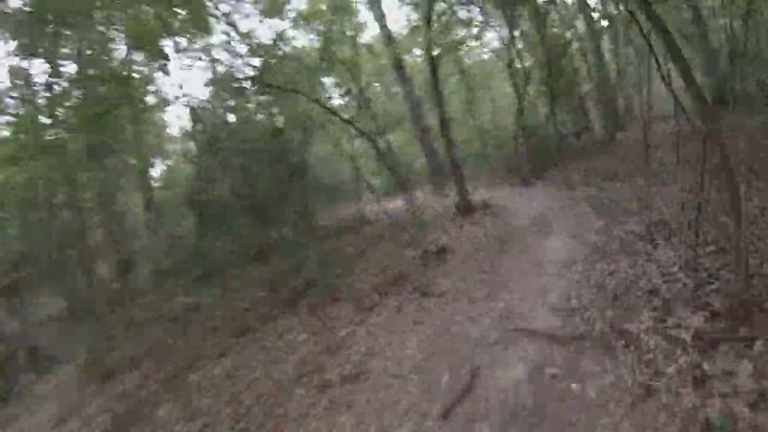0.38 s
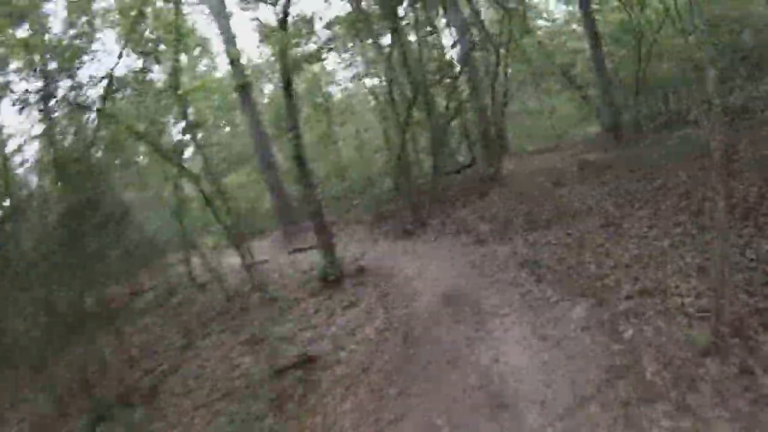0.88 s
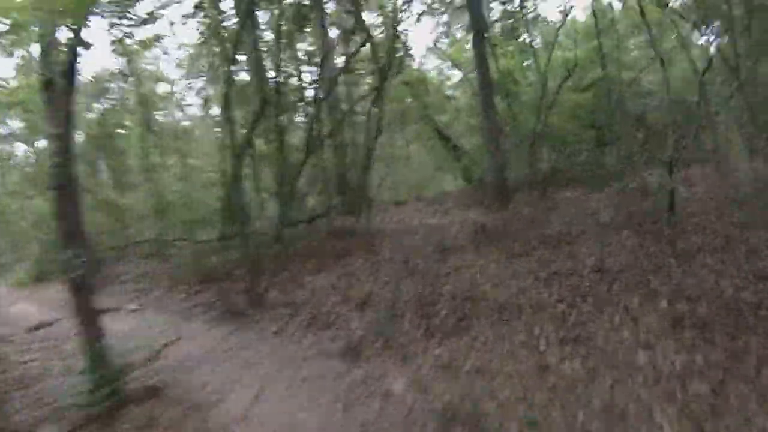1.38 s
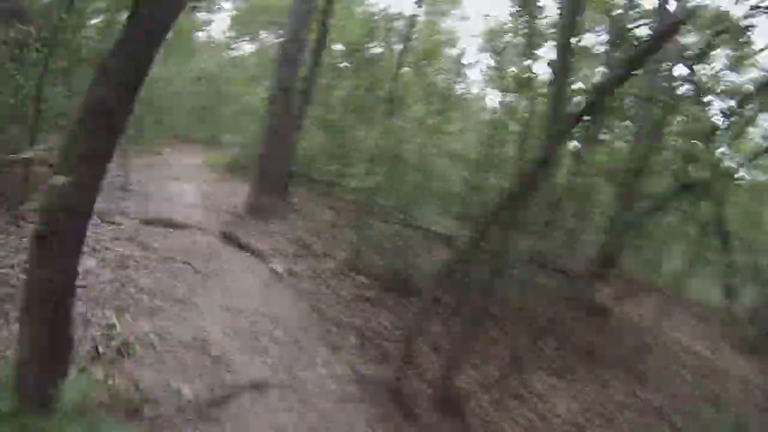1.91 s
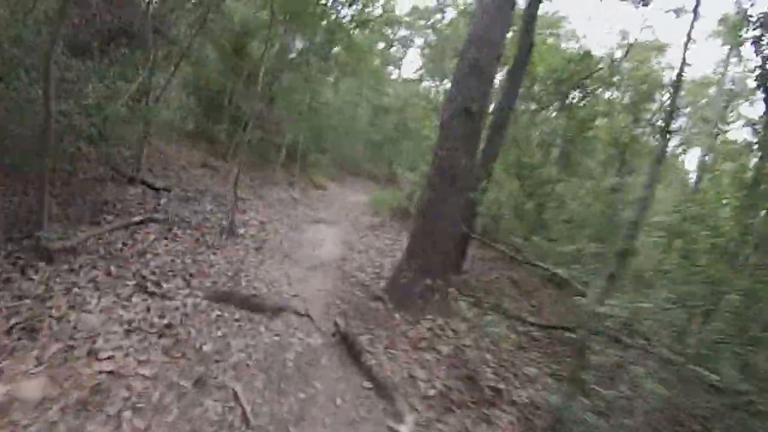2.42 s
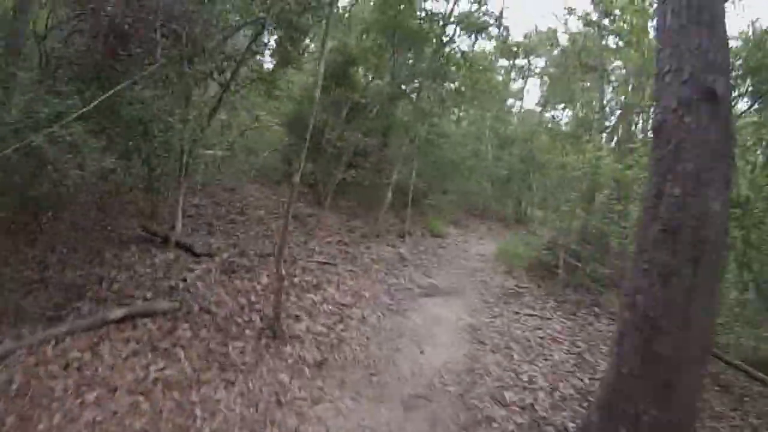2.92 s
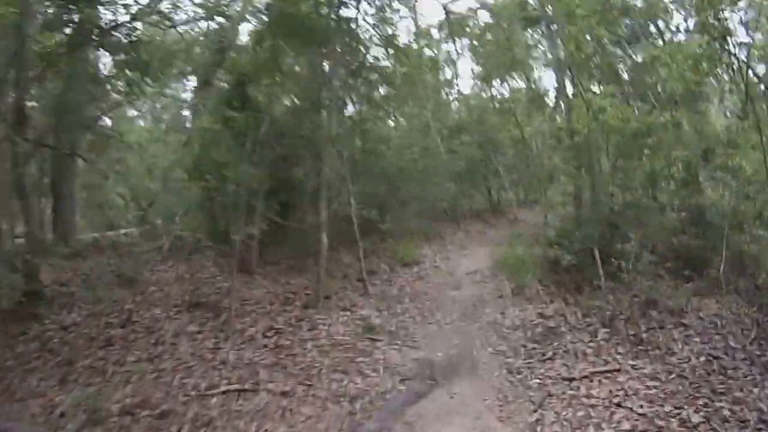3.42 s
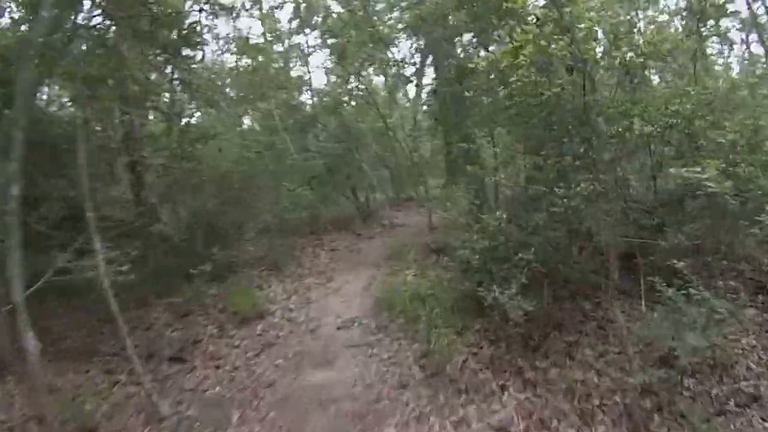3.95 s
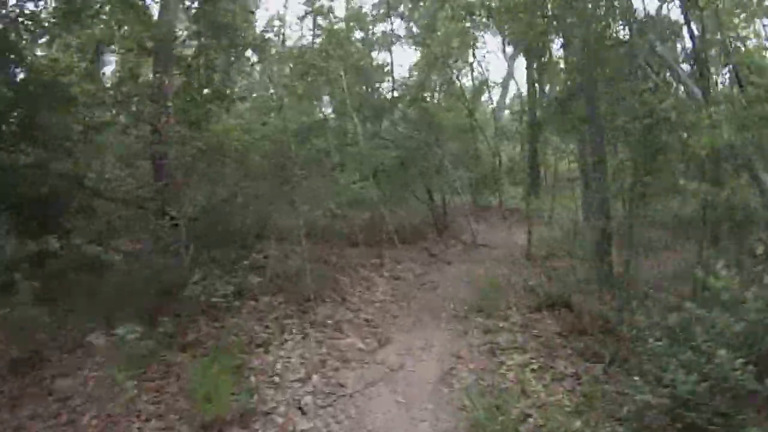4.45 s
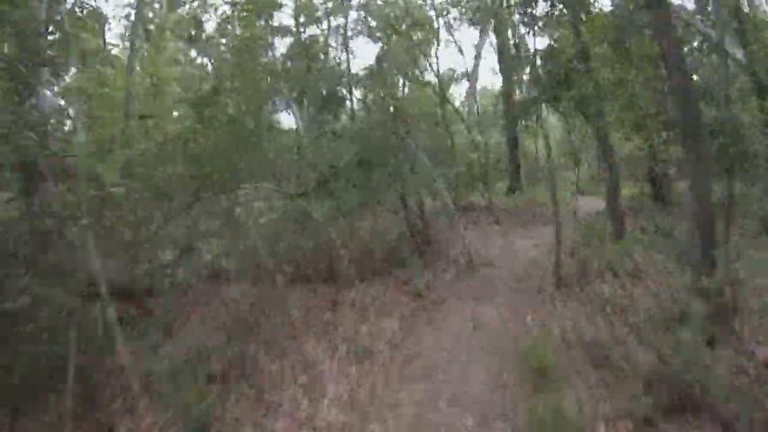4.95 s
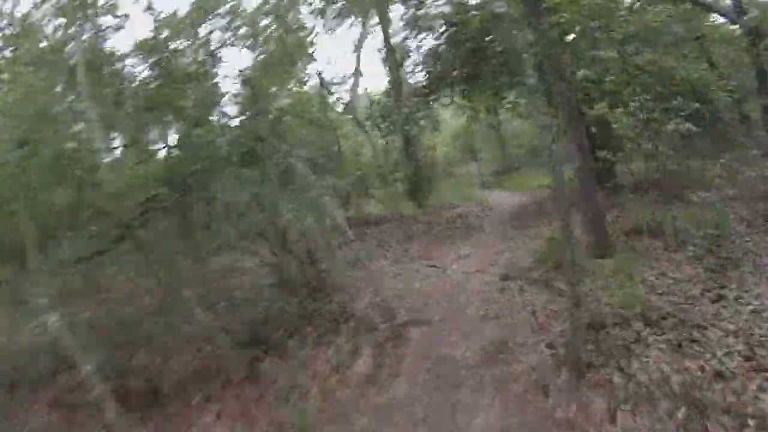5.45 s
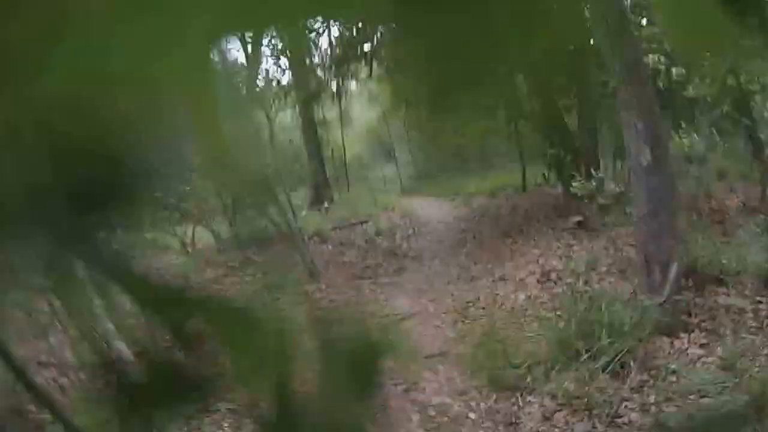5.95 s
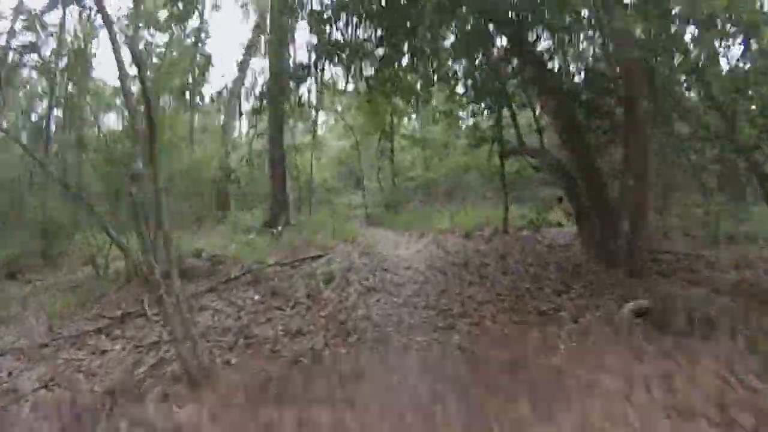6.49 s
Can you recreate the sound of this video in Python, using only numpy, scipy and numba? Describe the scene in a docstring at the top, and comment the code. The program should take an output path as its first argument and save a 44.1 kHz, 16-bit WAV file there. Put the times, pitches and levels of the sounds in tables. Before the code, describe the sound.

Rough woodland ride heard from the bike itself, close, dull and bass-heavy. Continuous low vibration and wind rumble swell and drop, punched by uneven thumps. Loose parts click and rattle, leaves or twigs scrape briefly, and tyres hiss softly underneath. One tiny distant bird chip is nearly buried early on. The loudest jolts make the level duck with a slight buzz, and a sharper clatter arrives shortly before the end.

```python
"""A low throb near 58 Hz comes first, dips at once, and is broken by a hard knock after a quarter second.
Woods, rough dirt trail: a camera clamped to a rolling bicycle, its microphone close on the frame.
The clamp is one swinging resonance; noise through resonances makes the frame's rumble, clicks and chatter.
Wind buffets the microphone, tyres hiss and hum, and one far bird chips as a falling whistle.
The camera's gain control turns down in small steps on big swings, a buzz, and ticks on its way back up."""
import sys
import numpy as np
from scipy import signal
from scipy.fft import rfft, irfft, next_fast_len
from scipy.io import wavfile
from scipy.ndimage import uniform_filter1d, map_coordinates
from numba import njit

SR = 44100
rng = np.random.default_rng(int(sys.argv[2]) if len(sys.argv) > 2 else 0)


def gain_from_db(level_db):
    """Turn a decibel level (scalar or array-like) into a linear amplitude factor."""
    decades = np.asarray(level_db, float) / 20
    return 10 ** decades


def wav_out(sig):
    """Save sig, one row per channel (or a flat mono array), as 16-bit PCM at SR to the path in sys.argv[1]."""
    wavfile.write(sys.argv[1], SR, np.round(np.clip(np.atleast_2d(sig).T, -1, 1) * 32767).astype(np.int16))


N = 291060
TIME = np.arange(N) / SR  # s


def along(points, hz):
    """(Hz, value) points read off on a log frequency axis."""
    f, v = np.transpose(points)
    return np.interp(np.log(hz + 1), np.log(f + 1), v)


def wobble(rate):
    """A smooth random curve with rate knots a second."""
    knots = rng.standard_normal(int(N * rate / SR) + 4)
    return map_coordinates(knots, [np.arange(N) * rate / SR])


def noise():
    """White noise of rms 1."""
    return rng.standard_normal(N)


def sparse(rate):
    """Random clicks, rate of them a second on average."""
    return noise() * (rng.random(N) < rate / SR)


def filtered(x, response):
    """x passed through a complex response of frequency."""
    m = next_fast_len(N + SR // 2)
    return irfft(rfft(x, m) * response(np.fft.rfftfreq(m, 1 / SR)), m)[:N]


def unit(x):
    """Scaled to rms 1."""
    return x / np.sqrt(np.mean(x ** 2))


def modes(table):
    """Causal response of (Hz, width Hz, dB) resonances, alternating in sign."""
    def response(f):
        return sum((-1) ** k * gain_from_db(db) * 1j * f * w / (c * c - f * f + 1j * f * w)
                   for k, (c, w, db) in enumerate(table))
    return response


def steep(table):
    """Gain of (Hz, width Hz, dB) resonances with steep sides: dark valleys between them."""
    def response(f):
        return np.sqrt(sum(gain_from_db(2 * db) / (1 + (2 * (f - c) / w) ** 2) ** 2 for c, w, db in table))
    return response


def swell(s, rise, fall):
    """A triangle in time that tops out at 1 at s; rise and fall in s."""
    return np.interp(TIME, [s - rise, s, s + fall], [0, 1, 0])


# tall swings of the clamp, first jolts and the swings that follow:
# t/s, top signed up or down (full scale 1), relative knock level/dB
TALL_SWINGS = [(0.2265, 0.5, -18), (0.2376, -.45, -32.5), (0.267, -0.3, -33), (0.2739, 0.76, -26.5),
               (0.3374, 0.62, -13), (0.346, -.62, -31), (0.5554, 0.26, -30.5), (0.5909, .35, -39),
               (0.684, -.33, -30), (0.7401, .36, -32), (0.8455, .36, -25.5), (0.95, -0.19, -23.5),
               (1.009, 0.28, -23), (1.0661, 0.97, -11.5), (1.1937, -0.33, -32.5), (1.3285, -.4, -25),
               (1.3713, 0.27, -33), (1.497, 0.27, -29), (1.524, -0.28, -30), (1.5515, 0.5, -19.5),
               (1.8912, -0.25, -32), (1.9335, 0.36, -25.5), (1.9614, -0.31, -32), (2.1205, 0.32, -31.5),
               (2.1645, -0.26, -35), (2.2112, -0.29, -36.5), (2.3467, 0.79, -17.5), (2.356, -0.78, -33.5),
               (2.549, -0.25, -34), (2.7434, .4, -33.5), (2.7501, -.58, -29), (2.8217, 0.29, -31),
               (2.878, -0.25, -34), (2.916, -0.3, -31.5), (2.925, 0.39, -23.5), (3.0193, 0.24, -36),
               (3.1001, -.3, -24.5), (3.139, -0.33, -26.5), (3.146, 0.58, -32), (3.242, .58, -22),
               (3.251, -.45, -34), (3.3525, -0.24, -34.5), (3.496, 0.24, -34), (3.57, -0.23, -32),
               (3.5964, 0.39, -29), (3.787, -0.3, -24.5), (3.856, .46, -25.5), (3.972, -0.25, -17.5),
               (4.0064, -0.24, -24.5), (4.1186, 0.33, -24), (4.1458, -0.26, -21.5), (4.2562, .32, -30),
               (4.3143, -0.37, -23), (4.3689, -0.24, -29), (4.5182, 0.89, -12), (4.553, 0.25, -31.5),
               (4.595, -0.23, -30), (4.6207, 0.32, -24.5), (4.733, 0.22, -26), (4.743, -0.58, -17),
               (4.7701, 0.82, -16), (4.855, -0.32, -26), (4.9693, -0.33, -29), (4.979, 0.47, -29.5),
               (5.0405, -0.21, -31), (5.102, 0.27, -34), (5.258, 0.19, -35), (5.4299, 0.26, -27),
               (5.4944, -0.21, -23.5), (5.501, 0.55, -27), (5.5817, 0.55, -18), (5.591, -.55, -29),
               (5.7221, -0.42, -23), (5.73, .68, -16), (5.8143, -0.31, -22), (5.928, -0.33, -25.5),
               (5.957, -0.33, -17), (6.1699, -0.31, -27), (6.177, 0.32, -33.5), (6.2745, -.41, -25.5),
               (6.4372, 0.23, -25.5), (6.488, 0.27, -21.5), (6.5689, 0.65, -17.5)]
# moments when the swing dies away: t/s, depth/dB, half length/s
LULLS = [(0.066, 9, 0.042), (1.375, 5, 0.061), (2.81, 17.5, 0.046), (3.423, 7.5, 0.036),
         (3.623, 16.5, 0.057), (4.409, 4.5, 0.079), (6.111, 14.5, 0.033)]
# spectrum shape of wind on the microphone: f/Hz, relative level/dB per Hz
BUFFET = [(8, -30.5), (18, -5), (30, 0.5), (50, 0.5), (80, -8), (120, -25), (300, -50), (1000, -88.5)]


def clamp():
    """One resonance, led up or down to the top of each tall swing, that rings on from there."""
    clamp_hz, usual_swing_db, buffet_db = 57.92, -19.5, -26.5  # both levels rms
    free_swing = 0.37  # wider swings than this are damped between the tall ones (full scale 1)
    lull_db = sum(db * np.exp(-((TIME - s) / half) ** 2) for s, db, half in LULLS)
    turn = 2 * np.pi * np.cumsum(clamp_hz + 1.2 * wobble(18)) / SR
    s, top, knock_db = np.transpose(TALL_SWINGS)
    at = np.round(s * SR).astype(int)

    # the old rhythm holds until shortly before a tall swing, then gives way
    shift = np.unwrap(np.pi * (top < 0) - turn[at])
    hold_until = np.maximum(s - .09, np.r_[0, s[:-1]] + 0.003)
    old_shift = np.r_[shift[0], shift[:-1]]
    turn = turn + np.interp(TIME, np.ravel([hold_until, s], "F"), np.ravel([old_shift, shift], "F"))

    size = np.sqrt(2) * gain_from_db(usual_swing_db - lull_db + 1.5 * wobble(20))
    calm = np.ones(N)
    # the knock carries part of the peak
    peaks = np.abs(top) - 0.44 * gain_from_db(knock_db)
    for when, peak, i in zip(s, peaks, at):
        near = slice(max(i - SR // 10, 0), i + SR // 10)
        t = TIME[near]
        grip = np.exp(-((t - when) / np.where(t < when, .008, .016)) ** 2)
        size[near] += grip * (peak - size[near])
        calm[near] *= 1 - grip

    # gusts push the microphone about, except around the tall swings
    gusts = noise() * gain_from_db(0.77 * wobble(8.8))
    buffet = filtered(gusts, lambda hz: gain_from_db(along(BUFFET, hz)))
    swing = size * np.cos(turn) + gain_from_db(buffet_db) * calm * unit(buffet)

    # left to itself, the rubber lining damps the widest swings
    envelope = np.abs(signal.hilbert(swing, next_fast_len(N))[:N])
    width = uniform_filter1d(envelope, size=SR // 100)
    return swing / (1 + calm * (width / free_swing) ** 4) ** 0.2


# low resonances of frame and fork: f/Hz, width/Hz, relative level/dB
FRAME = [(91.7, 40, 4), (180.6, 60, 1), (251.2, 44, -2.5), (422.8, 86, -13.5), (656, 110, -21)]


def frame():
    """Rough ground shakes the frame's low resonances; each tall swing has a short knock at its top."""
    rumble_db = -41.5  # rms before the lining
    ground = noise() * gain_from_db(2 * wobble(45) + 1.5 * wobble(9))
    rumble = gain_from_db(rumble_db) * unit(filtered(ground, steep(FRAME)))

    push, grit = np.zeros(N + SR), np.zeros(N + SR)
    t = np.arange(-SR // 40, SR // 40) / SR
    shape = np.exp(-(t / np.where(t < 0, .007, .006)) ** 2)
    early = np.roll(shape, -SR // 125)  # the grit burst comes 8 ms before the top
    for s, top, db in TALL_SWINGS:
        luck = rng.standard_normal(len(t))
        i = round((s + t[0]) * SR)
        knock_hz = 140 * (1 + .1 * luck[0])
        knock = gain_from_db(db - 8) * shape * np.cos(2 * np.pi * knock_hz * t)
        # the fork shudders just before the top
        lead = t + .01
        shudder = gain_from_db(db - 13.5) * np.exp(-(lead / 0.006) ** 2) * np.cos(2 * np.pi * 240 * lead)
        push[i:i + len(t)] += np.sign(top) * (knock + shudder)
        grit[i:i + len(t)] += gain_from_db(db + 15.0) * early * luck

    shaking = rumble + filtered(grit[:N], steep(FRAME))
    # the clamp's rubber lining passes little of the higher shaking
    return push[:N] + filtered(shaking, lambda hz: 1 / (1 + 1j * hz / 900) ** 2)


# short clicks and rattles, some of loose parts, some like the gain control's ticks:
# t/s, peak level/dB, relative brightness/dB
CLICKS = [(0.284, -36.5, -6), (0.9484, -33, -9.5), (0.988, -34, -14.5), (1.0193, -35, -8),
          (1.1439, -46.5, -8), (1.235, -36.5, -10), (1.402, -35.5, -11.5), (1.4806, -36, -8.5),
          (2.114, -43, -3), (2.1639, -47.5, 4), (2.2742, -40.5, -17), (2.359, -35.5, -13),
          (2.841, -36.5, -14), (3.2173, -32.5, -11), (3.5127, -26, -8.5), (3.6801, -36, -8),
          (3.7198, -40, -32.5), (3.7721, -36.5, -16), (3.963, -51.5, -1), (4.111, -43, -6.5),
          (4.4995, -51, 7.5), (4.5042, -46, 2), (4.764, -37, -2.5), (4.893, -45, -15),
          (4.9998, -41.5, -12.5), (5.029, -38, -41), (5.0599, -34, -32), (5.168, -44, -15),
          (5.23, -44.5, -26), (5.5402, -32.5, -36), (5.5725, -32.5, -12), (5.646, -46, -9.5),
          (5.718, -33, -13), (5.8141, -26, -4), (5.886, -36, -9), (5.9474, -35, -4.5), (5.9615, -22, -37.5),
          (5.972, -37, 6), (5.9923, -34, 12), (5.998, -33, 1), (6.032, -45, -8), (6.0467, -42.5, 11),
          (6.0692, -35.5, 9), (6.117, -47, -12), (6.273, -38.5, -10), (6.319, -44.5, -26),
          (6.349, -37.5, -12), (6.42, -45.5, -5.5), (6.557, -28, -4.5)]
# what the tubes ring with: f/Hz, relative level/dB, t60/s
TUBES = [(650, -13, .02), (1180, -11, .02), (1380, -1, .023), (1950, -3, .012), (2340, -10, .03),
         (3150, -4, .009), (3480, -5, .009), (5050, -27, .05)]


def clicks():
    """A short noise burst excites a dry crack and the tubes' modes, each time at new strengths and pitches."""
    out, t = np.zeros(N + SR), np.arange(SR // 12) / SR
    blow = t[:SR // 80] / 0.0014
    crack = np.sin(2 * np.pi * 5500 * t)
    for s, db, bright_db in CLICKS:
        ring = gain_from_db(bright_db + 8.5 - 60 * t / 0.0016) * crack
        for hz, level, t60 in TUBES:
            strength_db = level + (bright_db + 8) * (hz > 2800) + 2 * rng.standard_normal()
            mode_hz = hz * (1 + .025 * rng.standard_normal())
            ring += gain_from_db(strength_db - 60 * t / t60) * np.sin(2 * np.pi * mode_hz * t)
        burst = rng.standard_normal(len(blow)) * blow * np.exp(-blow)
        click = np.convolve(ring, burst)[:len(t)]
        out[round(s * SR):][:len(t)] += gain_from_db(db) * click / np.abs(click).max()
    return out[:N]


# leaves and twigs dragged along the frame, swelling and letting go: t/s of the loudest, rms level/dB
SCRAPES = [(.17, -61.5), (0.224, -49.5), (0.33, -59.5), (0.952, -53.5), (1.028, -49.5), (1.055, -55),
           (1.492, -56), (2.619, -64), (4.511, -58), (4.756, -47), (5.581, -48), (5.94, -53.5),
           (5.976, -40.5), (6.031, -51), (6.555, -47.5)]


def scrapes():
    """Dense ticks in broadened tube modes, swelling with each scrape and briefly with every tall swing."""
    ticks = sparse(6000) * gain_from_db(3 * wobble(120))
    broad = [(hz, 4.5 / t60, db / 2 - 8 * (hz > 2800)) for hz, db, t60 in TUBES]
    crunch = filtered(ticks, modes(broad + [(3000, 4000, -11)]))
    crunch = filtered(crunch, lambda hz: 1 / (1 + 1j * hz / 4500) ** 2)
    level = sum(gain_from_db(db) * swell(s, 0.035, 0.032) for s, db in SCRAPES)
    # every tall swing also crunches the loose parts for a moment
    level += sum(gain_from_db(db - 33) * swell(s, .012, 0.018) for s, _, db in TALL_SWINGS)
    return level * unit(crunch)


# how rough the trail is; chatter and tyre hiss follow it at their own offsets: t/s, relative level/dB
RIDE = [(0, -65.5), (.26, -60), (.55, -66), (1.38, -62.5), (1.62, -66.5), (2.66, -58), (3.38, -66.5),
        (3.65, -61), (4.78, -63.5), (5.27, -66.5), (5.85, -60.5), (6.1, -64.5), (6.6, -59)]


def roughness_db():
    """The roughness of the trail at every sample."""
    s, db = np.transpose(RIDE)
    return np.interp(TIME, s, db)


def chatter():
    """Sparse ticks keep the tubes humming, louder where the trail is rougher."""
    ticks = sparse(1300) * gain_from_db(3 * wobble(70))
    # faint chatter favours the modes that ring longest
    middle = [(hz, 3.6 / t60, db / 2 + 30 * np.log10(t60)) for hz, db, t60 in TUBES if 1000 < hz < 4000]
    hum = filtered(ticks, modes(middle))
    hum = filtered(hum, lambda hz: 1 / (1 + (hz / 3600) ** 2))
    flutter_db = 3 * wobble(30)
    return gain_from_db(roughness_db() - 4 + flutter_db) * unit(hum)


# tyre drone: start t/s, end t/s, first f/Hz, last f/Hz, level/dB (rms at the fullest, before it wavers)
DRONE = [(3.7, 4.007, 168.7, 192.8, -37.5), (4.185, 4.45, 190, 181, -34.5)]


def drone():
    """Tyre knobs on a firmer stretch hum near one frame resonance."""
    out, waver = np.zeros(N), gain_from_db(2.5 * wobble(35))
    for start, end, first_hz, last_hz, db in DRONE:
        u = np.clip((TIME - start) / (end - start), 0, 1)
        hz = first_hz + (last_hz - first_hz) * u + 5 * wobble(20)
        fade = np.abs(np.sin(np.pi * u)) ** .6
        out += gain_from_db(db) * fade * np.sin(2 * np.pi * np.cumsum(hz) / SR)
    return np.sqrt(2) * waver * out


# spectrum shape of tyre hiss on dirt and leaves: f/Hz, relative level/dB per Hz
TYRES = [(300, -22), (700, 1.5), (1500, 1.5), (3000, -21), (6000, -28.5), (12000, -35), (16000, -39)]


def tyres():
    """Tyre hiss that follows the trail's roughness, with sparse grit crackling in it."""
    hiss = filtered(noise() * gain_from_db(3.5 * wobble(30)), lambda hz: gain_from_db(along(TYRES, hz)))
    grit = filtered(sparse(200) * gain_from_db(4 * wobble(12)), modes([(3200, 3000, 0)]))
    return gain_from_db(roughness_db() - 4.5) * (unit(hiss) + gain_from_db(-13.0) * unit(grit))


def bird():
    """One far chip: a short falling whistle."""
    start_s, length_s, level_db = 1.838, .028, -63  # level at the peak
    first_hz, last_hz = 6300, 5650
    u = np.clip((TIME - start_s) / length_s, 0, 1)
    hz = first_hz + (last_hz - first_hz) * u
    fade = np.interp(u, [0, .7, 1], [0, 1, 0]) ** 2  # swells for 70 % of its length
    return gain_from_db(level_db) * fade * np.sin(2 * np.pi * np.cumsum(hz) / SR)


def air():
    """Wavering broad hiss of air past the microphone, weak in the lows."""
    hiss = filtered(noise(), lambda hz: 1 / (1 + 1j * hz / 3000) / (1 + (1500 / (hz + 1)) ** 2))
    return gain_from_db(-78 + 2.1 * wobble(10)) * unit(hiss)


def scene():
    """Everything reaches one microphone."""
    bike = clamp() + frame() + clicks() + scrapes() + chatter() + drone() + tyres()
    return (bike + bird() + air())[None]


@njit
def stepped_gain(x, limit, fall, rise, step_db, top_db, lag, quiet):
    """Gain falls faster the more the output overshoots, in whole steps; it steps up only near zero."""
    y, wanted, gain_db = np.zeros_like(x), top_db, top_db
    for i in range(len(x)):
        over = abs(y[i - lag]) - limit
        wanted = wanted - fall * over if over > 0 else min(wanted + rise, top_db)
        if wanted < gain_db - step_db:
            gain_db -= step_db
        elif wanted >= gain_db + step_db and abs(x[i]) < quiet:
            gain_db += step_db
        y[i] = x[i] * 10 ** (gain_db / 20)
    return y


def low_pass(x):
    """Removes everything above the highest recorded frequency."""
    return signal.sosfilt(signal.butter(12, 15820, fs=SR, output="sos"), x)


def record(dry):
    """Stepped gain control, then the dull microphone input rounding each step."""
    # fall in dB per sample per unit of overshoot, rise in dB per sample, lag in samples
    y = stepped_gain(dry[0], limit=0.245, fall=5400 / SR, rise=180 / SR, step_db=.45, top_db=2.2,
                     lag=round(0.00061 * SR), quiet=.08)
    mix = filtered(y, lambda hz: 1 / (1 + 1j * hz / 8000) ** 2)[None]
    return low_pass(mix)


dry = scene()
out = record(dry)
wav_out(out)
```